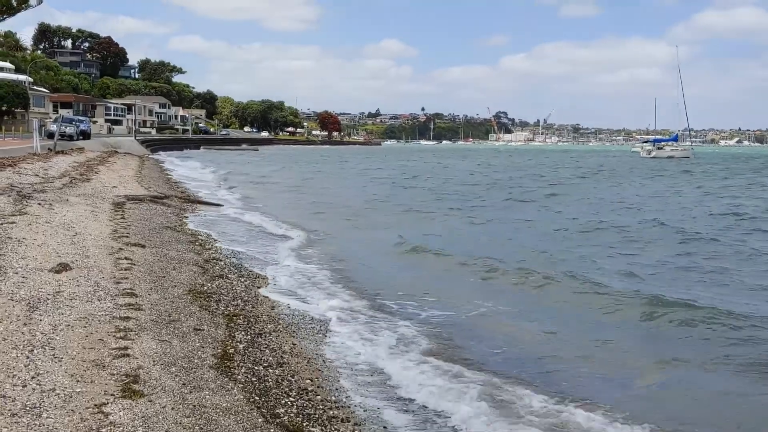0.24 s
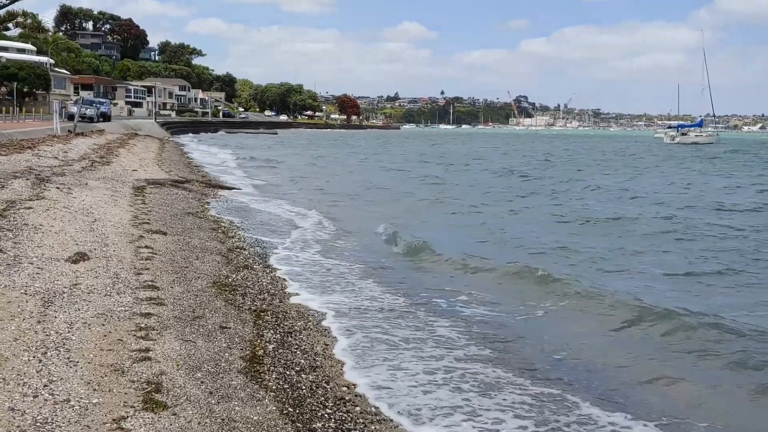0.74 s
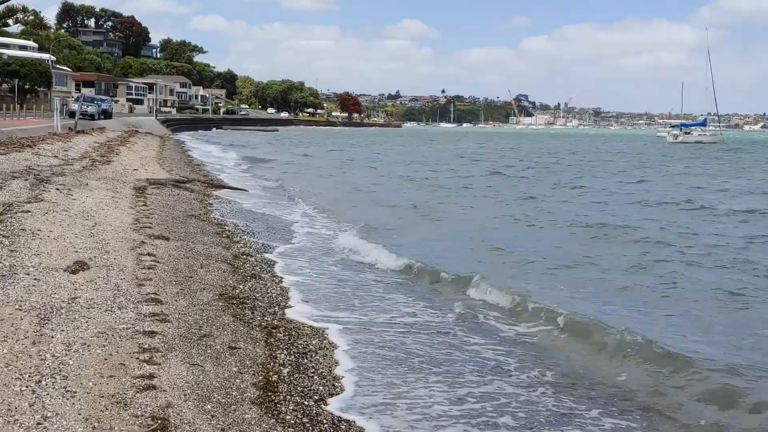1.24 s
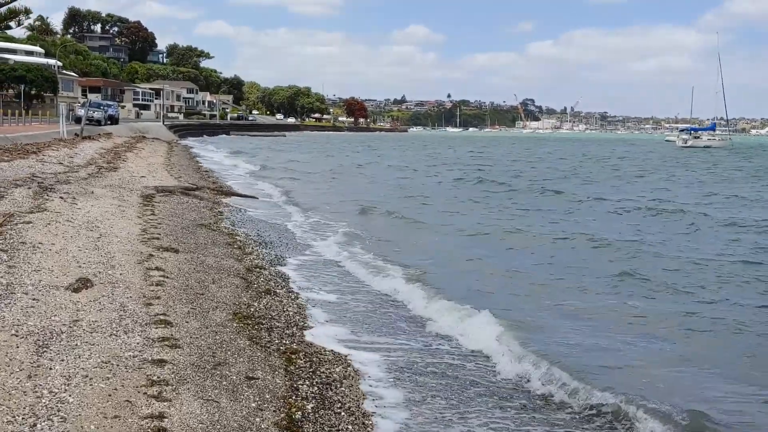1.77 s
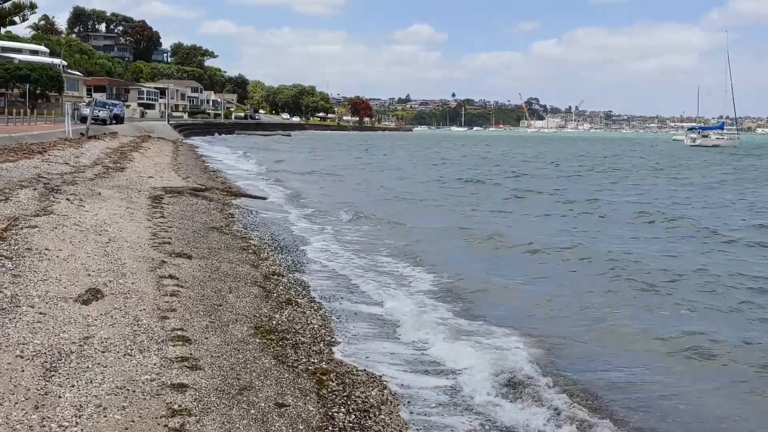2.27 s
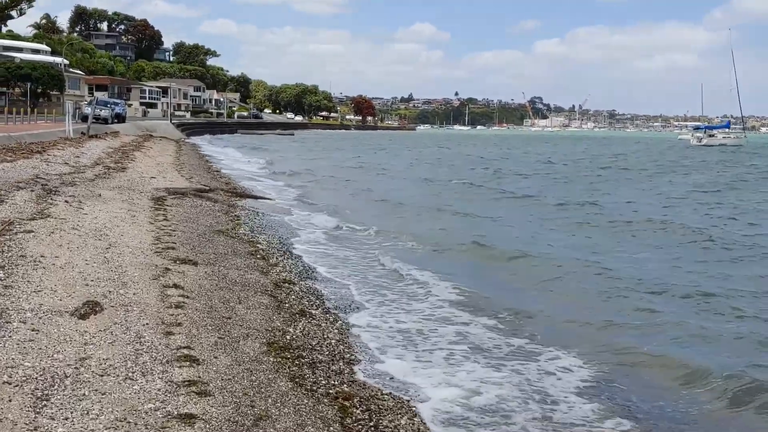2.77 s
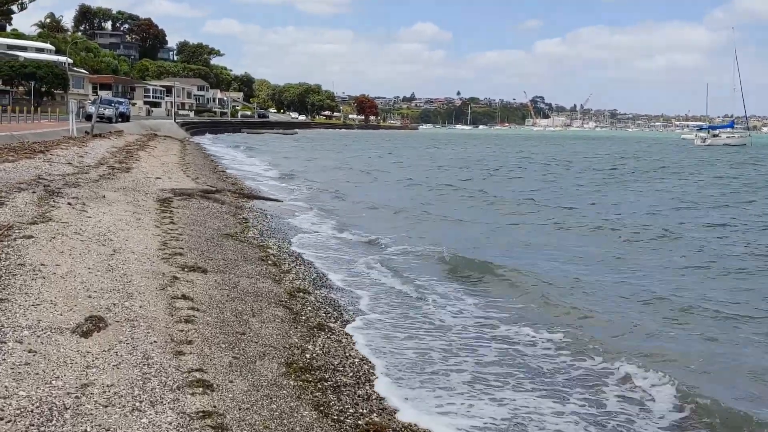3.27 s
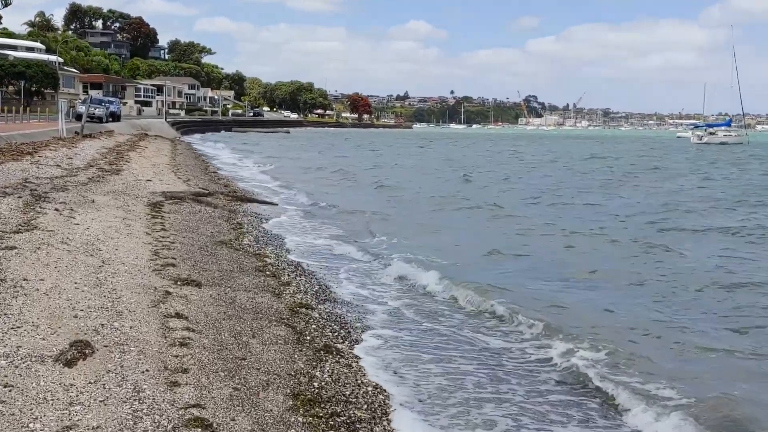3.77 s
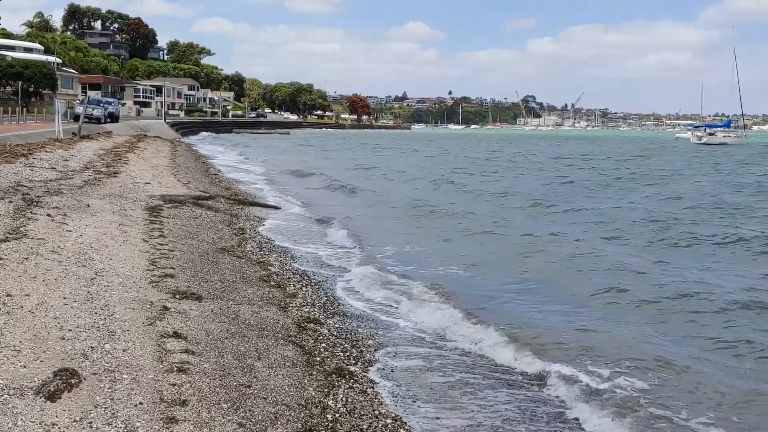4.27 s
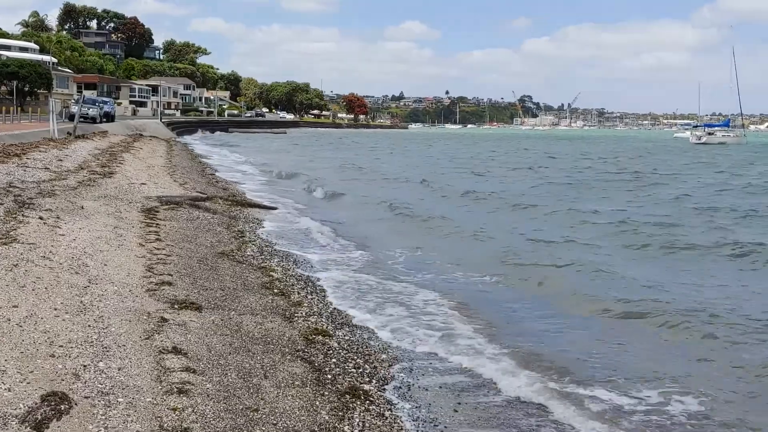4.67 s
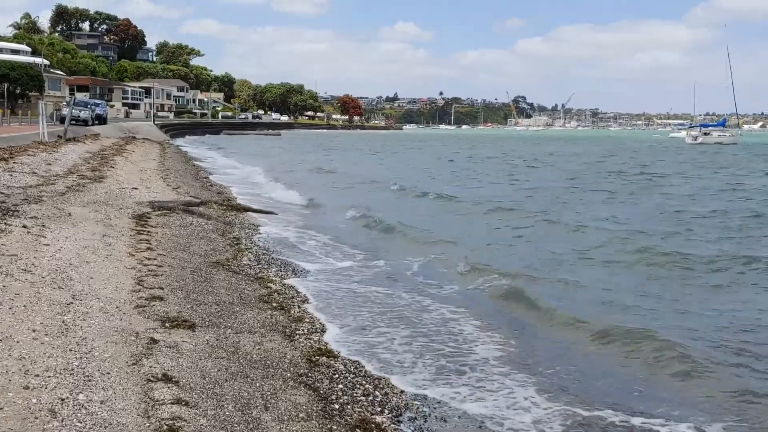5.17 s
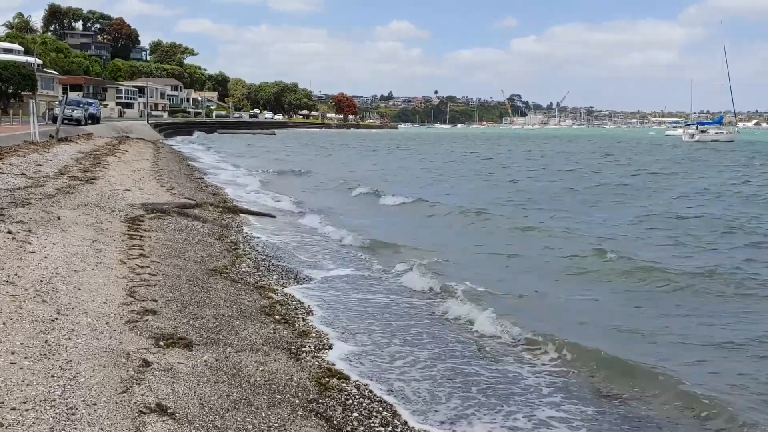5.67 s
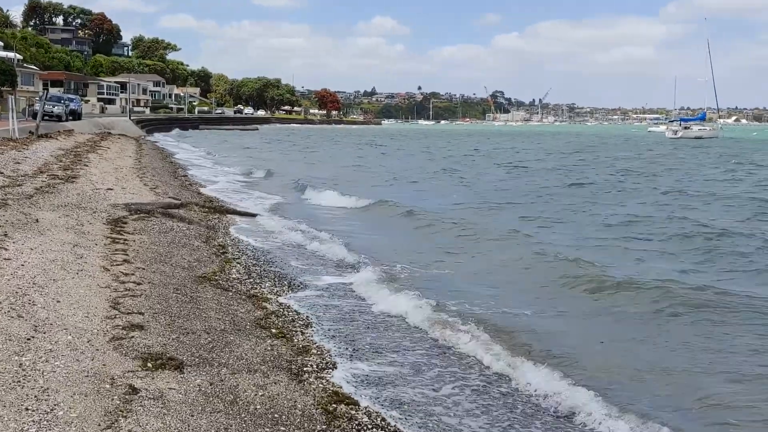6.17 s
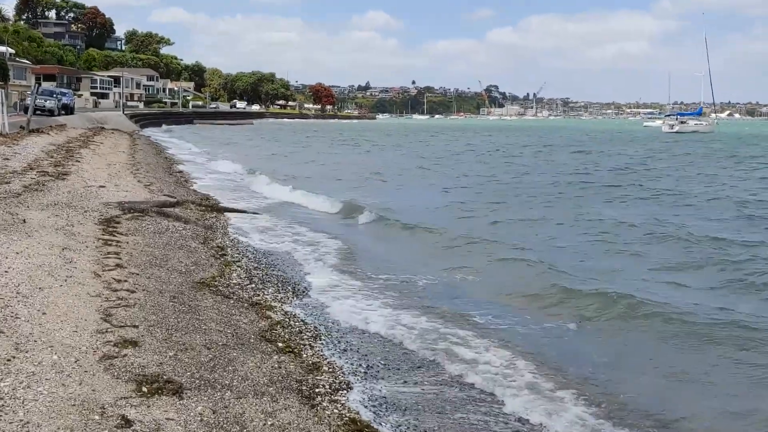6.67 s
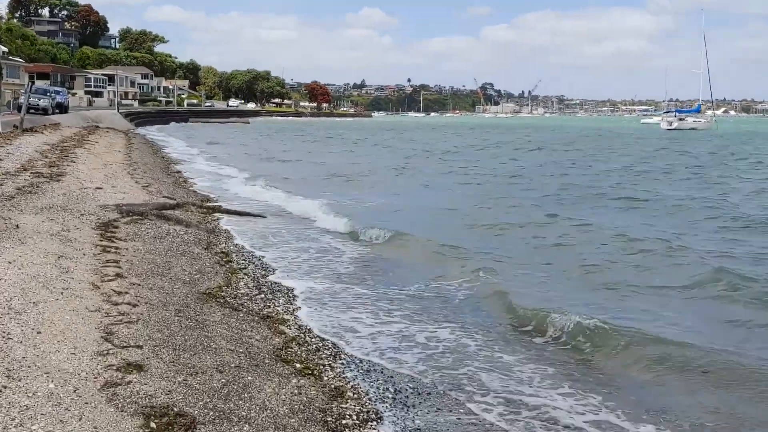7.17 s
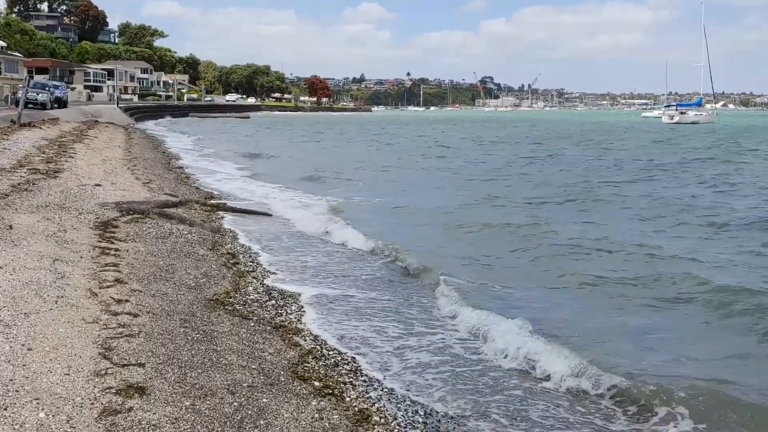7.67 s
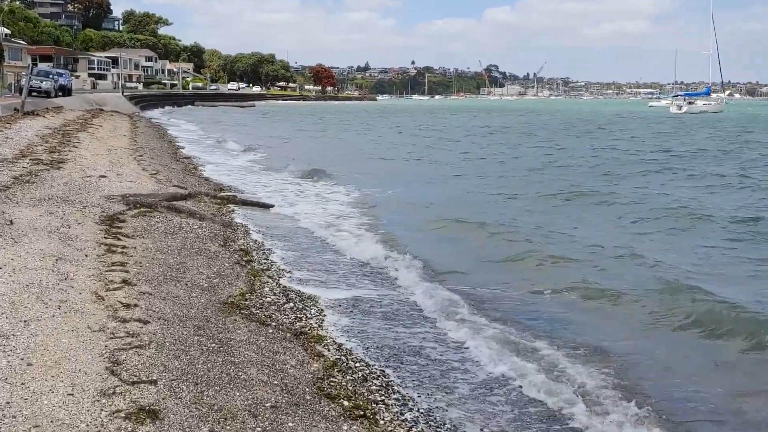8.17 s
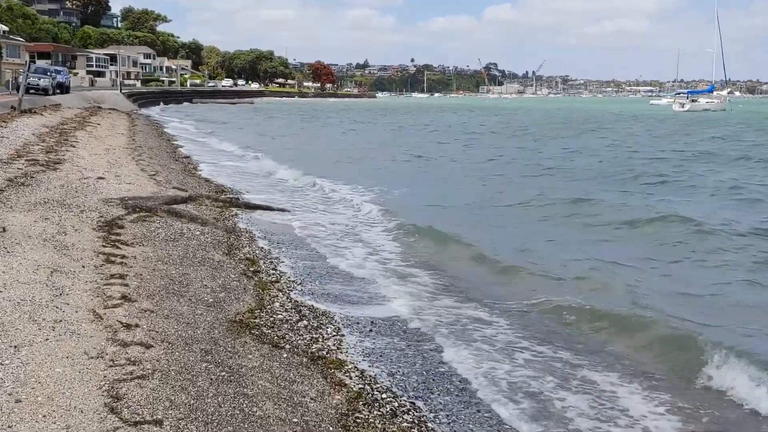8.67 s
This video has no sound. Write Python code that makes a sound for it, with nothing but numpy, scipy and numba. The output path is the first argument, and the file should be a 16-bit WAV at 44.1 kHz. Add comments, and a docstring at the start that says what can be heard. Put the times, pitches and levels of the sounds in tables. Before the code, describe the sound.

Small waves break in quick, uneven succession a few metres to the right of a handheld microphone on a shingle beach. Each crest brings a watery rush, bubbling froth and bright rattling pebbles, then thin fizzing foam. Droplets, glugs and little slaps stand out. Surf further along swells softly, and low breeze flutters unevenly on the microphone, mostly the right side. A small bird chirps briefly near seven seconds.

```python
"""Small waves on a shingle beach

Wind-driven waves break and wash up shingle and shells, a few metres to the right of a handheld microphone.
Each crest plunges and froths as swarms of ringing bubbles and rattles stones as swarms of damped modes.
Surf further along the shore is shaped noise; slaps, glugs, droplets and pebble knocks stand out singly.
Breeze turbulence is low noise fluttering at the two microphone ports; a small bird chirps in gliding tones."""
import sys
import numpy as np
from scipy import signal
from scipy.fft import rfft, irfft
from scipy.io import wavfile
from numba import njit

SR = 44100
rng = np.random.default_rng(int(sys.argv[2]) if len(sys.argv) > 2 else 0)


def digitize_waveform(pressure):
    """Quantize a signal to 16-bit integers and store it at the path in sys.argv[1].

    Rows of a 2-D input are taken as channels; values are limited to [-1, 1].
    """
    field = np.atleast_2d(pressure).T
    bounded = np.clip(field, -1, 1)
    quanta = np.round(bounded * 32767).astype(np.int16)
    wavfile.write(sys.argv[1], SR, quanta)


N = 394254
TIME = np.arange(N) / SR  # s
BINS = np.maximum(np.arange(N // 2 + 1) * SR / N, 1)  # Hz

# crests that break on the beach: (time [s], relative level [dB], rise [s], hold [s], nominal fade [s],
# then re the crest: rattling shingle [dB], plunging water [dB], fizzing foam [dB])
BREAKERS = [(-0.1, -52.5, 0.15, 0.22, 0.28, 3.5, -7, -13), (0.384, -49.5, 0.16, 0.14, 0.2, 3, -9.5, -14.5),
            (0.733, -55, 0.072, 0.2, 0.12, 1, -2.5, -21), (1.207, -66, 0.26, 0.64, 0.27, 13, 2.5, -8.5),
            (1.68, -51.5, 0.085, 0.37, 0.48, 3.5, -10, -15.5),
            (2.125, -49.5, 0.067, 0.076, 0.061, 4.5, -8.5, -15.5),
            (2.463, -55, 0.04, 0.2, 0.047, 2, -3, -19.5), (2.846, -55.5, 0.022, 0.16, 0.14, -6, -4, -24),
            (3.254, -64, .02, 0.043, 0.33, 10.5, -1, -11), (3.48, -51.5, 0.29, 0.47, 0.24, 5, -6.5, -15),
            (3.985, -52.5, 0.018, 0.36, 0.023, 2.5, -7, -16.5),
            (4.392, -64, 0.083, 0.13, 0.22, 2.5, -30, -14), (4.708, -55.5, 0.12, 0.44, 0.5, 5.5, -11, -15),
            (5.11, -54, 0.1, 0.34, 0.038, 7.5, -12, -13.5), (5.446, -62.5, 0.026, .015, .03, 3, -15, 0),
            (5.483, -52.5, 0.044, 0.11, 0.22, 3.5, -8.5, -16.5),
            (5.764, -51, 0.09, 0.14, 0.2, 4.7, -7.5, -15.5), (6.118, -53, 0.14, 0.033, 0.063, 3, -10, -17),
            (7.158, -53, 0.076, 0.36, 0.14, 4.5, -4, -15.5),
            (7.662, -51.5, 0.12, 0.24, 0.13, 2.5, -2, -18.5), (8.087, -58, 0.13, 0.3, 0.29, 2, -5.5, -18),
            (8.484, -55.5, 0.14, 0.12, 0.58, 2, -7.5, -16.5)]
CREST_DB, STONES_DB, WATER_DB, FOAM_DB = np.transpose(BREAKERS)[[1, 5, 6, 7]]


def undb(db):
    """Level to amplitude: 20 dB is a factor of ten."""
    return 10 ** (np.asarray(db) / 20)


def unit(x):
    """Normalise the mean power to 1."""
    return x / np.sqrt(np.mean(x ** 2))


def curves(table):
    """Linear interpolation of a table's columns in time."""
    s, *columns = np.transpose(table)
    return [np.interp(TIME, s, c) for c in columns]


def by_frequency(table):
    """Linear interpolation of a table's columns over log frequency."""
    hz, *columns = np.transpose(table)
    return np.array([np.interp(np.log(BINS), np.log(np.sort(hz)), c) for c in columns])


def colour(x, spectrum):
    """Linear filtering: multiply the spectrum by a frequency response, then set rms 1."""
    return unit(irfft(rfft(x) * undb(by_frequency(spectrum)), N))


def flutter(rate, depth_db):
    """Random amplitude modulation: a new level about rate times a second, with mean power 1."""
    steps = rng.standard_normal(4096)
    return unit(undb(depth_db * np.interp(TIME * rate, np.arange(len(steps)), steps)))


@njit
def ring(start, hz, cycles, size, rise):
    """Damped oscillation: sines that fall 60 dB in so many cycles while their pitch rises."""
    out = np.zeros(N)
    for k in range(len(start)):
        first = int(start[k] * SR)
        length = int(cycles[k] * SR / hz[k]) + 1
        phase = 0.
        gain = size[k]
        fade = np.exp(-np.log(1000) / length)
        for i in range(max(0, min(length, N - first))):
            phase += 2 * np.pi * hz[k] * (1 + rise * i / length) / SR
            out[first + i] += gain * np.sin(phase)
            gain *= fade
    return out


def bubbles(s, db, hz, cycles, rise, swell):
    """Damped resonance with a soft start: a ring less a shorter one lasting the share swell of its life."""
    s, hz = np.array(s), np.array(hz)
    long_ring = ring(s, hz, cycles, undb(db), float(rise))
    short_ring = ring(s, hz, cycles * swell, undb(db), float(rise * swell))
    return long_ring - short_ring


def grains(low_hz, high_hz, cycles, spread_db, rise, count):
    """Superposition of random rings: two unrelated swarms with many faint grains and a few strong."""
    swarms = []
    for _ in range(2):
        when, pitch, damping, strength = rng.random((count, 4)).T
        hz = low_hz * (min(high_hz, .4 * SR) / low_hz) ** pitch
        size = undb(-spread_db * np.log(np.maximum(strength, 1 / 160)))
        size = size * rng.choice([-1, 1], count)
        # high grains are brief; here they are also given more height
        swarm = ring(when * N / SR, hz, cycles * (.5 + damping), size * hz / high_hz, float(rise))
        swarms.append(unit(swarm))
    return np.array(swarms)


def wash(swarm, blur_db, spectrum):
    """Central limit of many events: distinct grains over noise, the blur of countless fainter ones."""
    return colour(swarm + undb(blur_db) * rng.standard_normal((2, N)), spectrum)


def surges(levels_db, floor_db, linger=0.78):
    """Incoherent power sum: crests build, hold and decay over a steady or moving floor; linger scales the fades."""
    power = undb(floor_db) ** 2
    for (s, _, rise, hold, fade, *_), db in zip(BREAKERS, levels_db):
        age = TIME - s
        build = np.clip(age / rise, 0, 1) ** 1.05
        decay = np.exp(-np.maximum(age - rise - hold, 0) / (fade * linger))
        power = power + undb(db) ** 2 * build * decay
    return np.sqrt(power)


def partly_alike(shared, own, likeness):
    """Partial coherence: two equal-power signals whose correlation is likeness."""
    return np.array([likeness * shared + np.sqrt(1 - likeness ** 2) * own, shared])


def buffet(length, hz):
    """Band-limited turbulence: a rounded puff of noise with a narrower hollow resonance at its centre."""
    age = np.arange(-SR // 8, SR // 8) / SR
    shape = .5 ** (2 * (age / length) ** 2)
    puff = 0
    for ratio, db in ((2.0, 0), (1.27, -5)):  # band edges as ratios to the centre, level in dB
        band = signal.butter(2, [hz / ratio, hz * ratio], "band", fs=SR, output="sos")
        puff = puff + undb(db) * unit(signal.sosfilt(band, rng.standard_normal(len(age))))
    return unit(puff * shape) * np.sqrt(np.mean(shape ** 2))


def wind():
    """Eddy scale sets coherence: big eddies reach both ports partly alike, small puffs only one."""
    # the breeze: (time [s], relative level at the left port [dB], at the right port [dB])
    breeze_db = [(0, -71, -65), (.15, -69.5, -63.5), (.38, -67, -66), (.5, -71, -61.5), (.66, -72, -70.5),
                 (.8, -73, -65), (1.08, -65.5, -61), (1.25, -68.5, -60.5), (1.39, -72, -70),
                 (1.46, -69, -75), (1.6, -67, -75), (1.71, -70, -64), (1.79, -70, -81), (2.05, -67.5, -72),
                 (2.26, -69, -77), (2.41, -68, -82), (2.52, -68.5, -66), (2.68, -76, -67.5),
                 (2.78, -73, -73), (2.9, -72, -64.5), (3.3, -72, -66.5), (3.44, -75.5, -68.5),
                 (3.6, -70, -60), (3.9, -70, -67), (4.3, -69.5, -64.5), (4.45, -74, -67), (4.7, -75, -70),
                 (4.88, -79, -71), (4.96, -71, -63), (5.12, -76, -68), (5.38, -69, -64.5), (5.8, -67, -64),
                 (5.9, -71, -68.5), (6.25, -66.5, -63.5), (6.43, -65, -59), (6.52, -75, -72),
                 (6.64, -66, -60), (6.74, -66, -70), (6.82, -68, -59), (6.9, -70, -71),
                 (6.97, -71.5, -60.5), (7.1, -68.5, -67.5), (7.3, -73, -65), (7.55, -67, -58),
                 (7.8, -70, -61), (8.05, -69, -64), (8.18, -69, -62), (8.32, -71, -62), (8.5, -71, -60.5),
                 (8.75, -64.5, -62.5), (8.94, -75, -67)]
    # spectrum of the big eddies: (frequency [Hz], level [dB])
    eddy_spectrum = [(25, -42), (60, -16), (110, -5), (180, 0.5), (260, 2.5), (400, 1.5), (700, 0.5),
                     (1400, -6), (4000, -57)]
    # spectrum of the small puffs: (frequency [Hz], level [dB])
    puff_spectrum = [(40, -41), (150, -9.5), (300, -6), (450, -3), (750, -0.5), (1100, -0.5), (1800, -19),
                     (5000, -56)]
    # the strongest buffets, plus two low bursts at 7.16 s that sound with the slap there: (time [s], level
    # before shaping [dB], half-length to -12 dB [s], centre frequency [Hz], port [0 left, 1 right])
    strong_buffets = [(.2, -54.5, 0.032, 520, 1), (0.539, -55, 0.02, 420, 1), (1.136, -47.5, 0.012, 566, 1),
                      (1.268, -56, 0.013, 433, 0), (1.552, -51, .006, 472, 0), (2.013, -56, 0.014, 395, 0),
                      (2.121, -54, .011, 517, 0), (3.505, -58, 0.014, 526, 1), (3.978, -52, .013, 500, 1),
                      (4.349, -53, 0.013, 650, 0), (5.25, -52, 0.013, 450, 1),
                      (5.579, -54.5, 0.016, 440, 0), (6.096, -49, 0.012, 600, 0),
                      (6.305, -55, 0.032, 343, 1), (6.461, -52.5, 0.011, 480, 0),
                      (6.638, -59, .025, 377, 1), (6.859, -52, 0.014, 418, 1), (7.033, -52, 0.022, 370, 1),
                      (7.162, -54, 0.018, 600, 0), (7.166, -55, 0.016, 400, 1), (7.226, -55, .012, 420, 1),
                      (7.48, -53.5, 0.032, 527, 1), (7.849, -45.5, 0.011, 540, 1),
                      (8.189, -60, 0.024, 487, 0), (8.774, -48.5, 0.0051, 650, 0)]
    breeze = undb(curves(breeze_db))
    gusts = np.array([port * undb(1.2) * flutter(rate=45, depth_db=3.0) for port in breeze])
    shared, own = colour(rng.standard_normal((2, N)), eddy_spectrum)
    eddies = partly_alike(shared, own, likeness=0.58)
    # countless weaker eddies
    puffs = np.array([port * undb(-3.5) * flutter(rate=50, depth_db=5) for port in breeze])
    out = gusts * eddies + puffs * colour(rng.standard_normal((2, N)), puff_spectrum)
    for s, db, length, hz, port in strong_buffets:
        puff = buffet(length, hz)
        first = int(s * SR) - len(puff) // 2
        out[int(port), first:first + len(puff)] += undb(db) * puff[:N - first]
    return out


def bird(gain_db=-8, echo_db=-4, echo_t60_s=.25):
    """Frequency modulation and reverberation: gliding chirps with a soft diffuse echo from the houses."""
    # (time [s], length [s], relative level [dB], start frequency [Hz], end frequency [Hz])
    chirps = [(6.888, .022, -48, 5130, 5020), (6.916, .018, -58, 4950, 5050),
              (6.935, .026, -66, 4980, 5180), (6.976, .026, -66, 5220, 5050),
              (6.999, .043, -67, 5700, 6120), (7.172, .013, -55, 5700, 5780),
              (7.198, .014, -56, 5720, 5760)]
    song = np.zeros(N)
    for s, length, db, start_hz, end_hz in chirps:
        during = (TIME >= s) & (TIME < s + length)
        progress = (TIME[during] - s) / length
        phase = 2 * np.pi * np.cumsum(start_hz + (end_hz - start_hz) * progress) / SR
        song[during] += undb(db + gain_db) * np.sin(np.pi * progress) * np.sin(phase)
    song *= flutter(rate=550, depth_db=6.0)  # the notes are raspy
    tail = rng.standard_normal(SR // 2) * np.exp(-np.log(1000) * TIME[:SR // 2] / echo_t60_s)
    echo = signal.fftconvolve(song, tail / np.sqrt(np.sum(tail ** 2)))[:N]
    return song + undb(echo_db) * echo


def far_surf():
    """Many distant sources sum to Gaussian noise: a smooth, band-limited roar that swells and ebbs."""
    # waves further along the shore: (time [s], relative level [dB])
    far_level = [(0, -52), (.5, -62), (1.0, -50.5), (1.3, -52), (1.8, -48.5), (2.25, -55.5), (2.7, -54),
                 (3.25, -60.5), (3.75, -49), (4.3, -49.5), (4.6, -55), (5.15, -52), (6.12, -47), (6.5, -53),
                 (7.05, -59), (7.9, -48.5), (8.3, -55.5), (8.94, -54)]
    # spectrum: (frequency [Hz], level [dB])
    spectrum = [(300, -65), (600, -38), (1200, -12), (1360, -14), (1450, -2), (1540, 0.5), (1680, -8),
                (1900, -16.5), (3000, -16), (6000, -60)]
    far_db, = curves(far_level)
    roar = colour(rng.standard_normal((2, N)), spectrum)
    return roar * undb(far_db - 2.5) * flutter(rate=20, depth_db=1.7)


def spatter():
    """Impulsive excitation: droplets plink and larger pebbles clack as strongly as each crest breaks."""
    # spectrum of droplets and clacks: (frequency [Hz], level [dB])
    spectrum = [(600, -29), (1300, -3), (1700, 1), (3500, -0.5), (4500, -3), (6000, -24), (9000, -32)]
    drops = grains(low_hz=1450, high_hz=3800, cycles=50, spread_db=1.5, rise=.1, count=600)[0]
    clacks = grains(low_hz=1800, high_hz=4200, cycles=12, spread_db=1.2, rise=0, count=1500)[0]
    return (colour(drops, spectrum) * surges(CREST_DB - 6.5, floor_db=-71.5)
            + colour(clacks, spectrum) * surges(CREST_DB + STONES_DB - 10.5, floor_db=-75))


def knocks(top_hz=6000):
    """Modal superposition: each pebble contact rings the same few short modes, dulled by the water."""
    # a large pebble knocks and rebounds: (time [s], relative level [dB])
    contacts = [(3.8201, -23), (3.8222, -31), (3.8268, -31)]
    # its modes: (frequency [Hz], level [dB], cycles to fall 60 dB)
    modes = [(1950, -9, 14), (3000, -9, 26), (3430, -2.5, 45), (4900, -15, 25)]
    s, db = np.transpose(contacts)
    rings = 0
    for hz, mode_db, cycles in modes:
        pitches, lives = np.full(len(s), float(hz)), np.full(len(s), float(cycles))
        rings = rings + bubbles(s, db + mode_db, pitches, lives, rise=0, swell=0.18)
    return signal.sosfilt(signal.butter(4, top_hz, fs=SR, output="sos"), rings)


def glugs(gain_db=1.5, t60_s=0.056):
    """Volume resonance: air gulped under folding wavelets rings low and rises a little in pitch."""
    # pockets of air: (time [s], relative level [dB], starting pitch [Hz])
    pockets = [(1.386, -55, 516), (1.714, -58, 387), (1.715, -56, 775), (1.920, -56, 775),
               (2.866, -59.5, 473), (3.052, -56, 301), (3.810, -57, 430), (4.747, -59, 260),
               (4.954, -61, 473), (5.246, -51.5, 344), (5.577, -53, 424), (5.792, -57, 440),
               (6.248, -51, 473), (6.302, -54, 258), (6.850, -53, 732), (6.853, -52, 512),
               (7.012, -50, 344), (7.158, -50, 430), (7.161, -51, 818), (7.178, -57, 215),
               (7.221, -54, 516), (7.481, -51, 732), (8.120, -55, 516)]
    s, db, hz = np.transpose(pockets)
    return bubbles(s, db + gain_db, hz, hz * t60_s, rise=.12, swell=.13)


def plips(cycles=42, rise=0.042, gain_db=-5.5):
    """Bubble resonance: single loud bubbles near by ring above the froth, with a soft start."""
    # (time [s], relative level [dB], starting pitch [Hz])
    bursts = [(.216, -29, 2230), (1.729, -28, 1540), (1.927, -26, 2950), (2.228, -27, 3000),
              (2.707, -31, 2970), (3.668, -27.5, 2850), (3.889, -25, 3250), (3.9165, -24, 2600),
              (4.182, -30, 3530), (5.2, -28, 1540), (5.225, -25, 3000), (5.863, -30, 2900),
              (5.869, -28, 1770), (6.334, -31, 1500), (6.446, -37.5, 2800), (6.634, -34, 1500),
              (7.492, -27.5, 1830), (7.961, -28, 2730), (8.645, -28, 2670), (8.768, -28.5, 2840)]
    s, db, hz = np.transpose(bursts)
    return bubbles(s, db + gain_db, hz, np.full(len(s), float(cycles)), rise, swell=.14)


def slaps(attack_s=.0012):
    """Impact noise: the lip of a wave slaps the water, a broad splash with fast attack and decay."""
    # (time [s], relative level [dB], fade to 1/e [s])
    impacts = [(1.718, -55, .012), (2.214, -52, .01), (2.852, -57, .02), (4.872, -58, 0.021),
               (6.095, -55, .009), (6.853, -61, 0.0077), (7.04, -55, .009), (7.1607, -50.5, .012),
               (7.221, -53, .013)]
    # spectrum: (frequency [Hz], level [dB])
    spectrum = [(70, -28), (200, -6), (400, -1), (850, -1), (1300, 1), (2200, -15), (4500, -30),
                (9000, -60)]
    shape = 0
    for s, db, fade in impacts:
        age = np.maximum(TIME - s, 0)
        attack = np.minimum(age / attack_s, 1)
        shape = shape + undb(db) * attack * np.exp(-np.minimum(age / fade, 20))
    return shape * colour(rng.standard_normal(N), spectrum)


def fizz():
    """Small bubbles ring high: a dense swarm of bursting foam follows each crest."""
    # spectrum: (frequency [Hz], level [dB])
    spectrum = [(3500, -0.5), (5200, 2), (6400, -1.5), (7200, -4.5), (8500, -8.5), (9300, -1), (9900, -5),
                (10600, -2.5), (11400, -6.5), (12500, -14.5)]
    swarm = grains(low_hz=4370, high_hz=12130, cycles=45, spread_db=2.5, rise=.05, count=70000)
    return wash(swarm, 5.2, spectrum) * surges(CREST_DB + FOAM_DB, floor_db=-75.5, linger=0.92)


def shingle():
    """Collisions excite damped modes: dragged stones rattle at fixed pitches, even between crests."""
    # spectrum: (frequency [Hz], level [dB])
    spectrum = [(1200, -34), (2200, -10.5), (2750, -0.5), (3100, 0.5), (3550, -1), (3760, -3), (4080, -2.5),
                (4500, -16.5), (5100, -16.5), (6000, -22.5), (7500, -31.5), (12000, -49)]
    swarm = grains(low_hz=2194, high_hz=7040, cycles=37, spread_db=2.0, rise=0, count=30000)
    level = surges(CREST_DB + STONES_DB - 1.18, floor_db=-62, linger=1.1)
    return wash(swarm, 0.5, spectrum) * level * flutter(rate=27, depth_db=0.26)


def froth():
    """Bubble resonance: a swarm of small bubbles rises in pitch, over swash that runs between crests."""
    # spectrum: (frequency [Hz], level [dB])
    spectrum = [(250, -60), (600, -34), (900, -19), (1300, -7), (1550, -1), (1800, 0.5), (2050, -1.5),
                (2400, -4.5), (3000, -13), (4500, -5.5), (9000, -60)]
    swarm = grains(low_hz=1295, high_hz=3594, cycles=41, spread_db=2.0, rise=0.21, count=24000)
    level = surges(CREST_DB + 1.9, floor_db=-59.5, linger=0.99)
    return wash(swarm, 5.0, spectrum) * level * flutter(rate=38, depth_db=0.1)


def lulls():
    """Amplitude modulation: Gaussian dips in level where the low water sound goes quiet in the lulls."""
    # (time [s], half-length to 1/e of the dip [s], dip [dB])
    dips = [(1.47, .04, -4), (2.41, .04, -1.5), (2.809, .035, -5), (4.72, .19, -5)]
    return undb(sum(db * np.exp(-np.minimum(((TIME - s) / length) ** 2, 20)) for s, length, db in dips))


def plunge():
    """Large bubbles ring low: plunging crests trap air, over small water slopping at the edge."""
    # small water slopping at the edge: (time [s], relative level [dB])
    lapping = [(0, -65), (1.3, -65), (1.46, -79), (1.65, -65), (3.3, -63.5), (4.3, -74), (4.5, -80.5),
               (4.8, -80), (5.2, -71), (6.7, -65.5), (7.08, -76), (7.3, -70), (8.94, -73)]
    # spectrum: (frequency [Hz], level [dB])
    spectrum = [(60, -48), (200, -27), (450, -10.5), (750, -5), (1000, -2), (1300, -1), (1700, -3),
                (2800, -28), (8000, -54)]
    lapping_db, = curves(lapping)
    swarm = grains(low_hz=344, high_hz=1896, cycles=9.2, spread_db=2.0, rise=0.2, count=9000)
    level = surges(CREST_DB + WATER_DB - 0.15, lapping_db, linger=0.99)
    return wash(swarm, 9.1, spectrum) * level * flutter(rate=22, depth_db=1.5) * lulls()


def surf():
    """Superposition of sources: each crest sounds water, stones and foam together; far surf is independent."""
    # the crest collapses unevenly, in small spills
    spills = flutter(rate=32, depth_db=0.85)
    near = plunge() + froth() + shingle() + fizz()
    return near * spills + far_surf()


def at_ports(field, point):
    """Spatial coherence: the long shoreline reaches the ports partly alike, a point source alike."""
    # colour at the two ports: (frequency [Hz], left level [dB], right level [dB])
    port_colour = [(200, -5, -2), (790, -4, 4.5), (1230, -4, 4), (1540, -7, 4.5), (2040, -6, 4.5),
                   (2460, -5, 2.5), (3100, -5.5, 3.5), (3640, -5, 4), (3690, -5, 0), (3870, -3.5, 3),
                   (4050, -5, 2.5), (4360, -1, 1), (4570, 1.5, -2.5), (5120, 3.5, -8.5), (5850, 6, -5),
                   (6600, 4.5, 4), (7400, 5, -2), (8350, 3.5, -17), (9300, 2, -1), (9900, 2.5, 2.5),
                   (10470, 5, 1.5), (11200, 6.5, 3), (12200, 1, 2)]
    # likeness of the surf at the two ports: (frequency [Hz], correlation [0-1])
    port_likeness = [(200, 0.5), (900, 0.74), (1250, 0.5), (1520, 1), (2000, 0.65), (2450, 0.55),
                     (2800, 0.74), (3500, 0.57), (4100, 0.42), (4900, 0.06), (12000, 0.1)]
    shared, own = rfft(field)
    likeness = np.clip(by_frequency(port_likeness)[0], 0, 1)
    pair = partly_alike(shared, own, likeness)
    return irfft((pair + rfft(point)) * undb(by_frequency(port_colour)), N)


def scene():
    """Linear superposition: the shore is coloured by the ports, and wind adds directly at them."""
    point = bird() + spatter() + knocks() + glugs() + plips() + slaps()
    return wind() + at_ports(surf(), point)


def record(dry):
    """Interference and band limits: the ports cancel a narrow treble band; filters cut rumble and top."""
    null_hz, null_width_hz, null_db = 7850, 330, -7.5
    null = undb(null_db * np.exp(-((BINS - null_hz) / null_width_hz) ** 2))
    highpass = signal.butter(2, 48, "high", fs=SR, output="sos")
    lowpass = signal.ellip(8, .2, 70, 12600, fs=SR, output="sos")
    return signal.sosfilt(np.vstack([highpass, lowpass]), irfft(rfft(dry) * null, N))


dry = scene()
out = record(dry)
digitize_waveform(out)
```